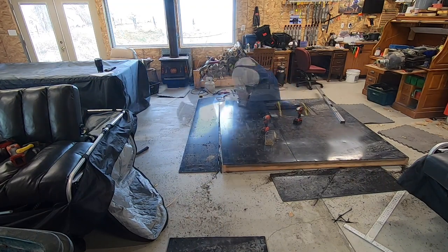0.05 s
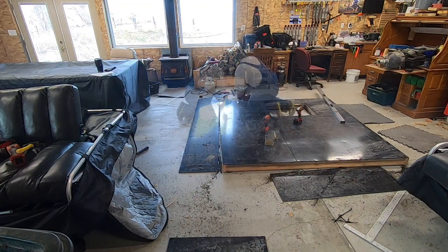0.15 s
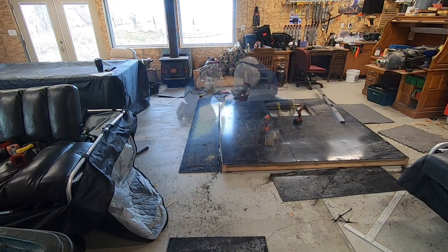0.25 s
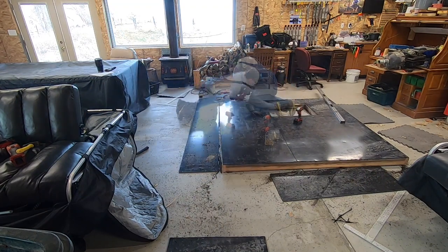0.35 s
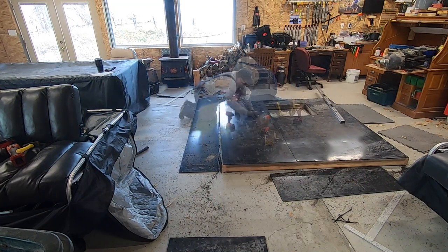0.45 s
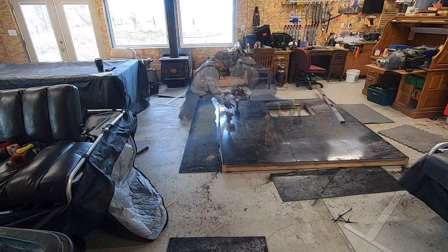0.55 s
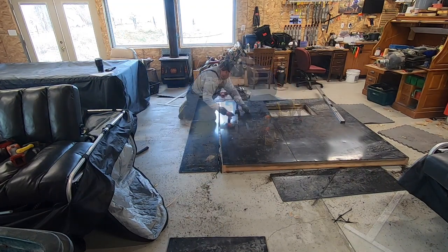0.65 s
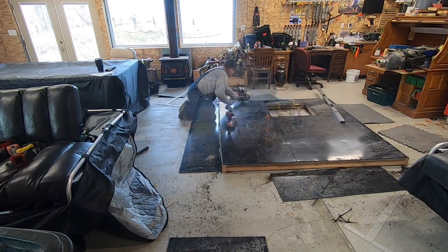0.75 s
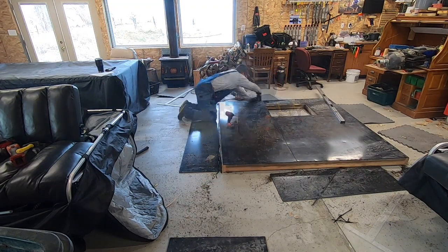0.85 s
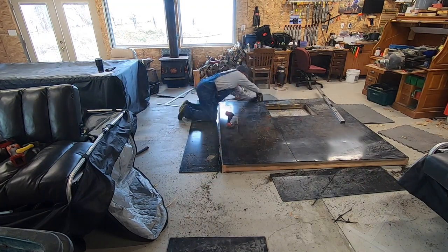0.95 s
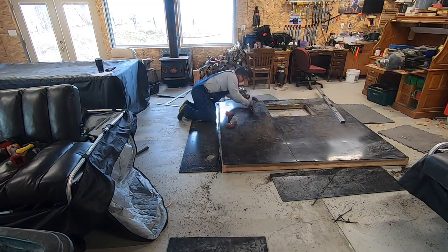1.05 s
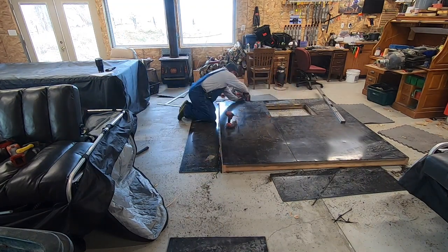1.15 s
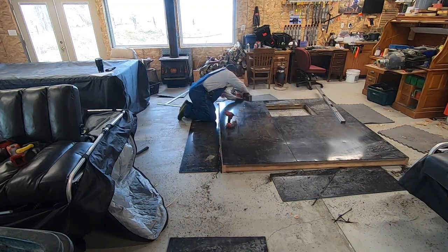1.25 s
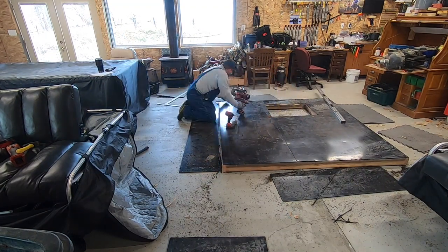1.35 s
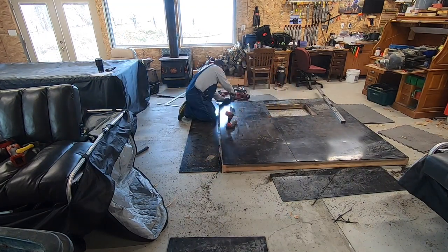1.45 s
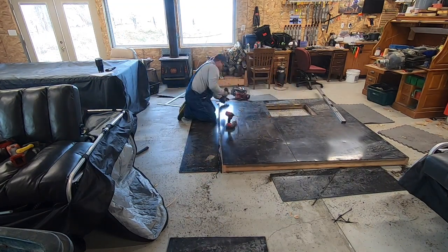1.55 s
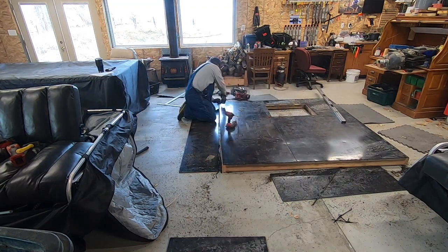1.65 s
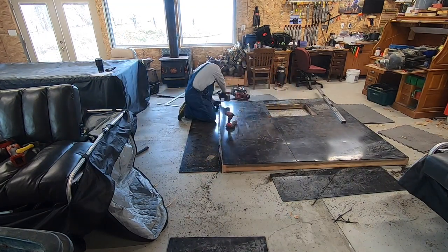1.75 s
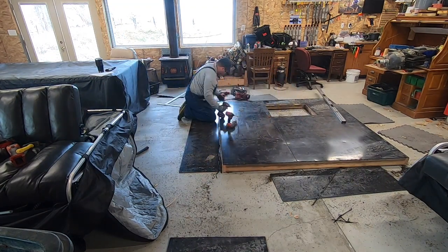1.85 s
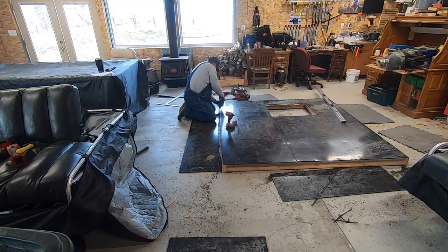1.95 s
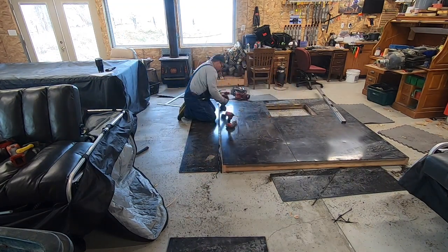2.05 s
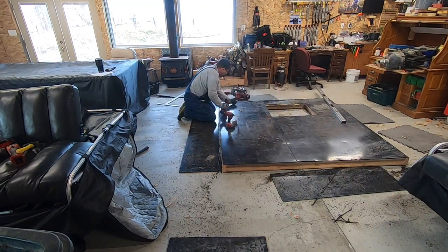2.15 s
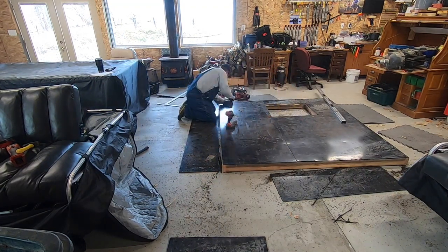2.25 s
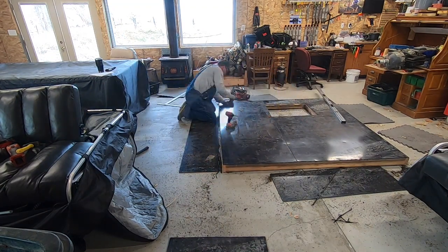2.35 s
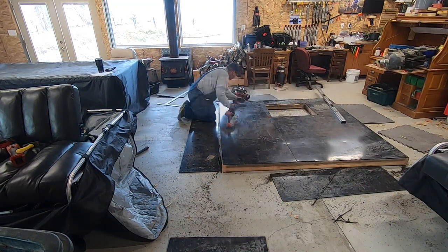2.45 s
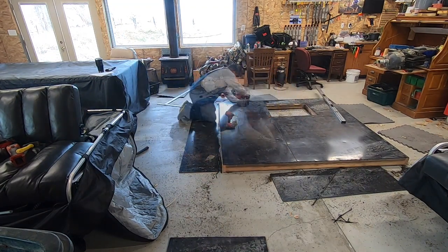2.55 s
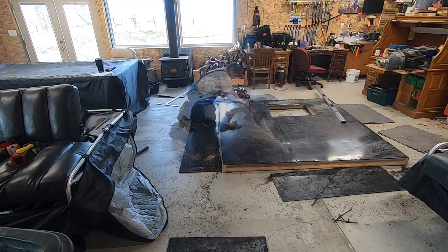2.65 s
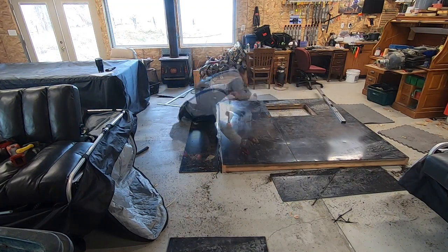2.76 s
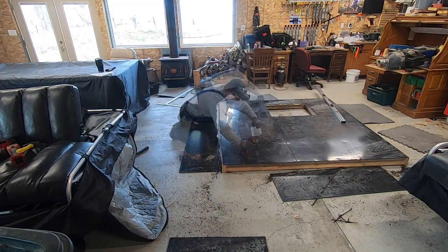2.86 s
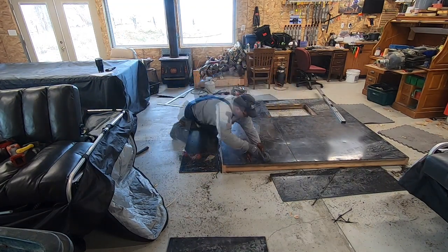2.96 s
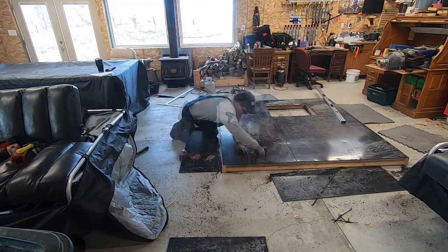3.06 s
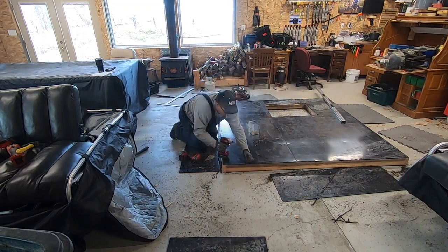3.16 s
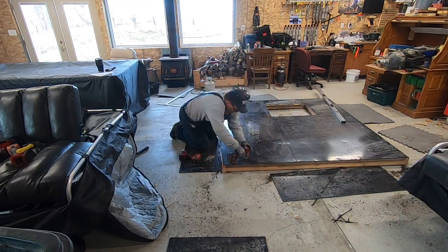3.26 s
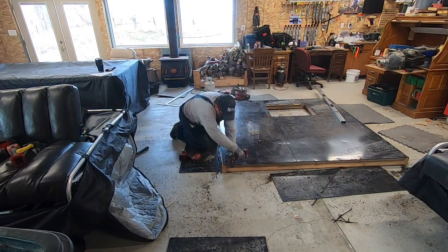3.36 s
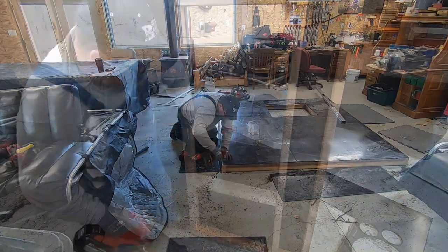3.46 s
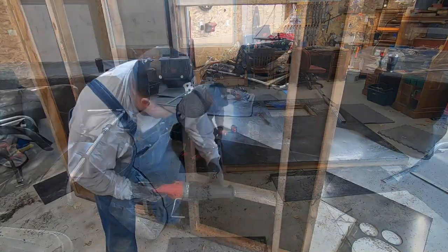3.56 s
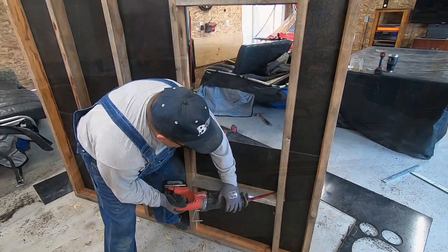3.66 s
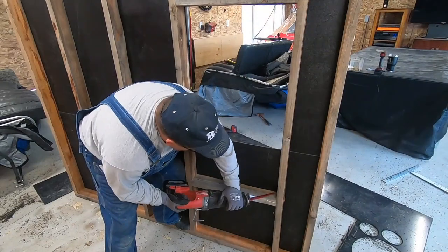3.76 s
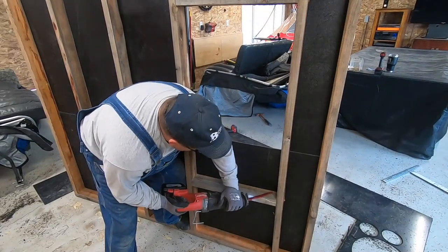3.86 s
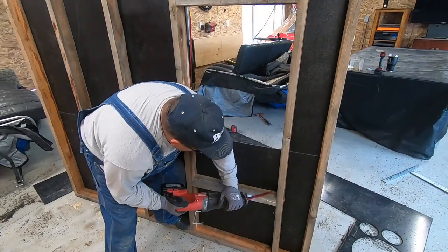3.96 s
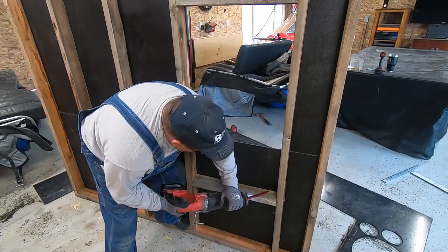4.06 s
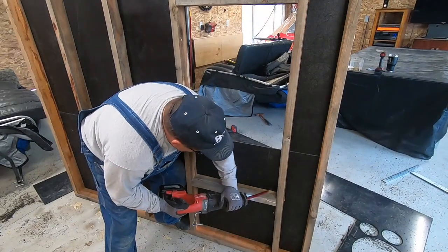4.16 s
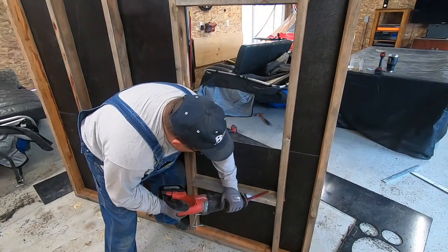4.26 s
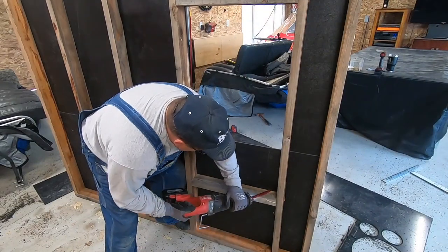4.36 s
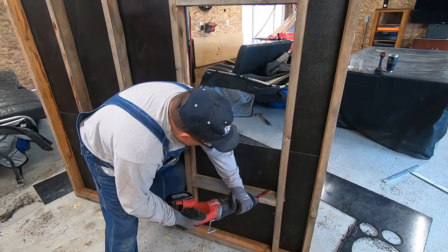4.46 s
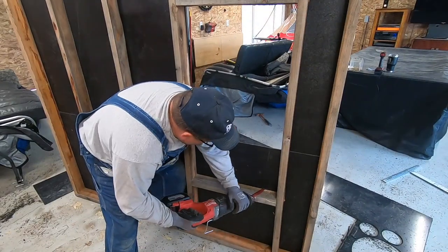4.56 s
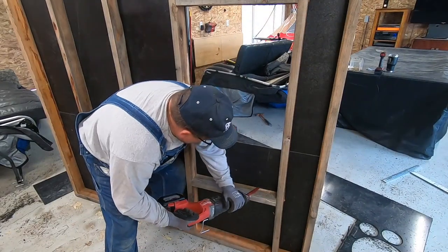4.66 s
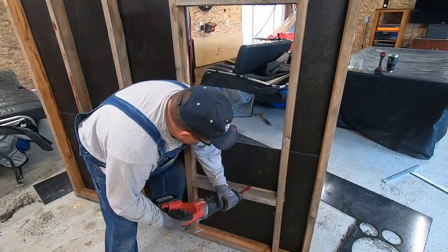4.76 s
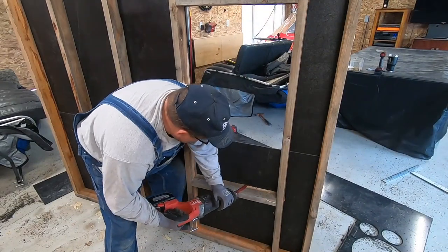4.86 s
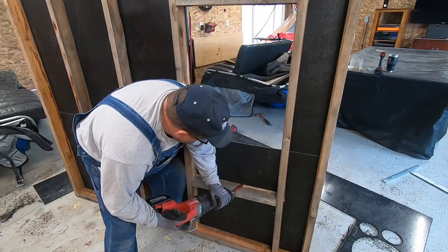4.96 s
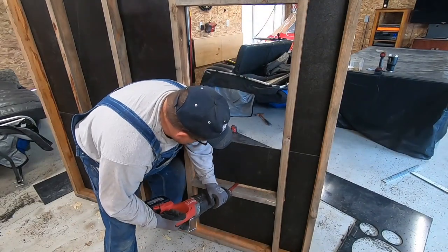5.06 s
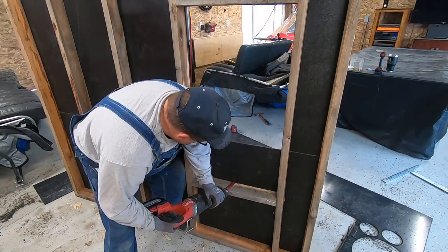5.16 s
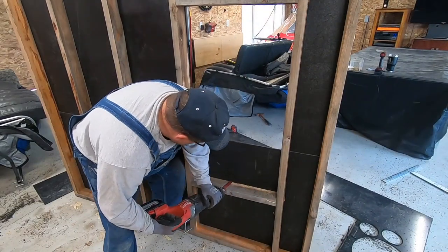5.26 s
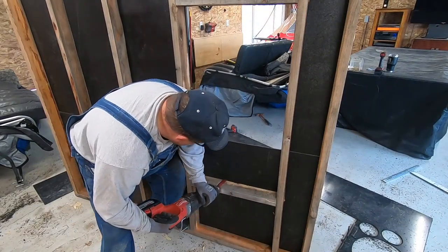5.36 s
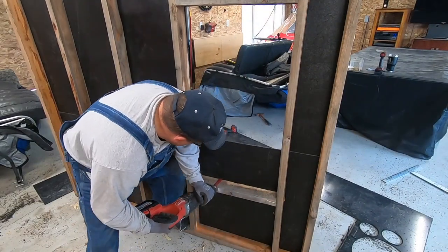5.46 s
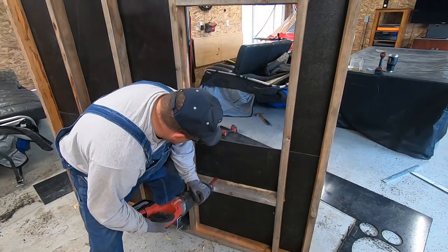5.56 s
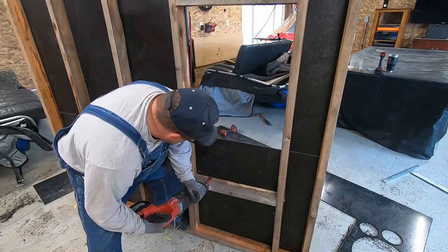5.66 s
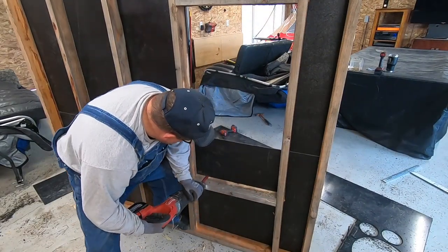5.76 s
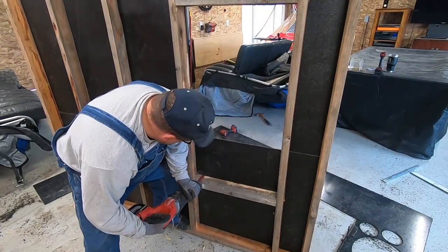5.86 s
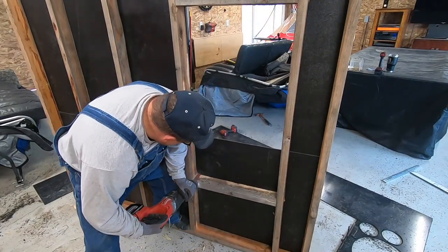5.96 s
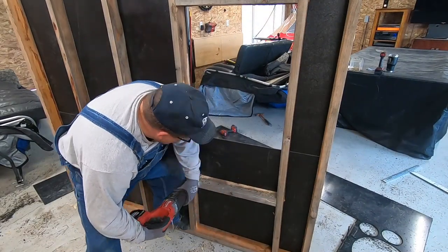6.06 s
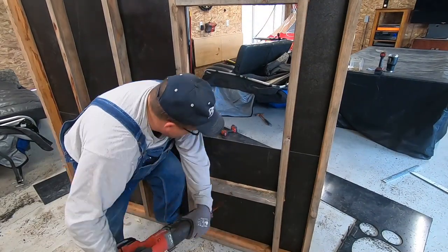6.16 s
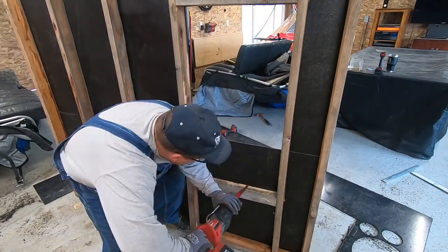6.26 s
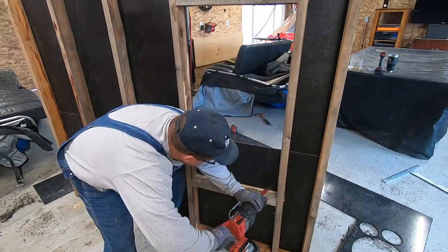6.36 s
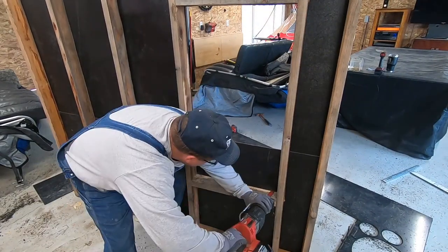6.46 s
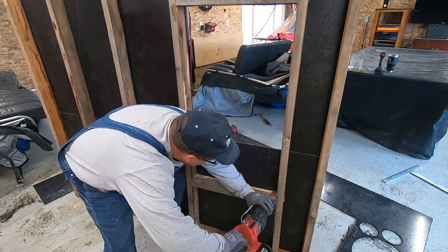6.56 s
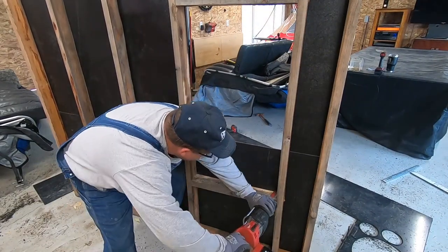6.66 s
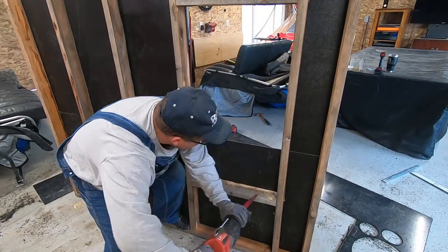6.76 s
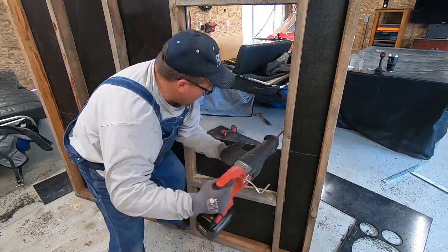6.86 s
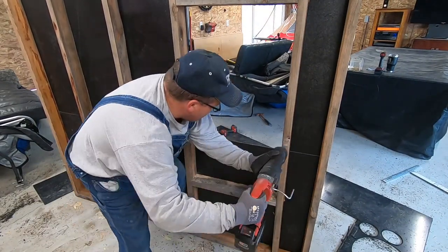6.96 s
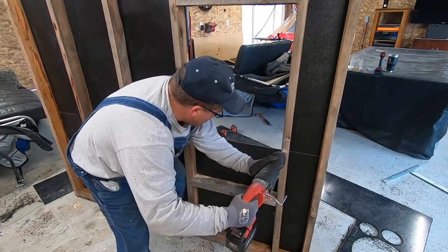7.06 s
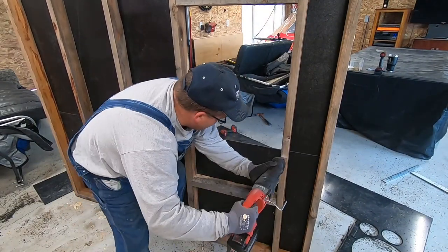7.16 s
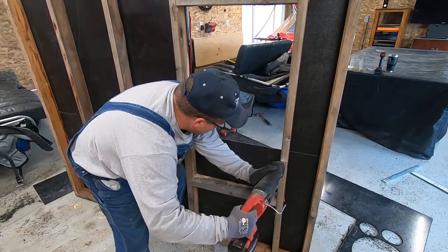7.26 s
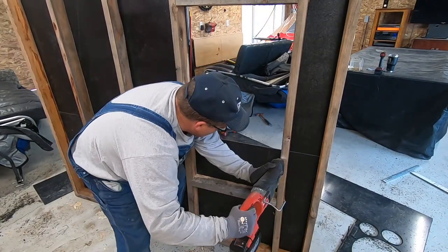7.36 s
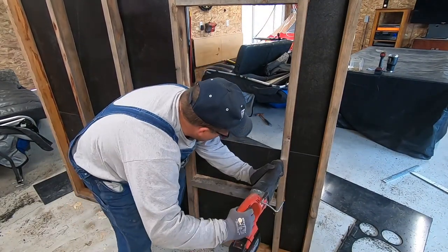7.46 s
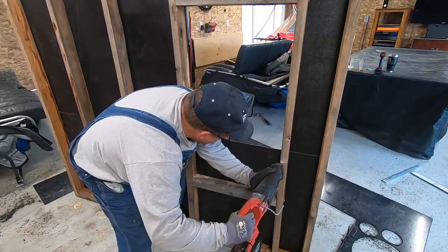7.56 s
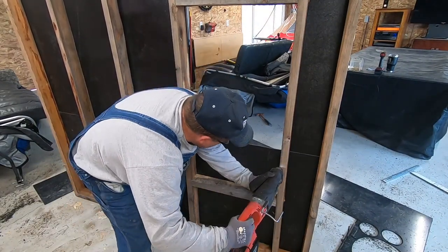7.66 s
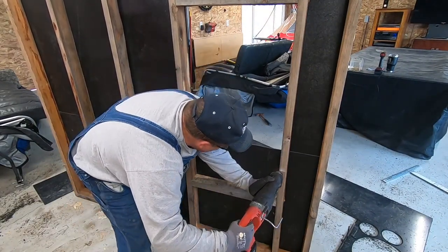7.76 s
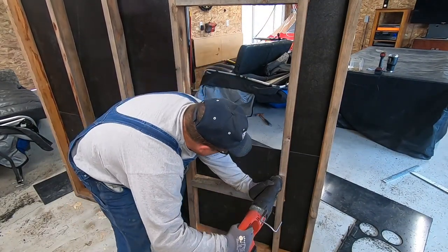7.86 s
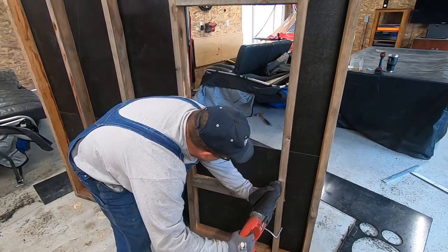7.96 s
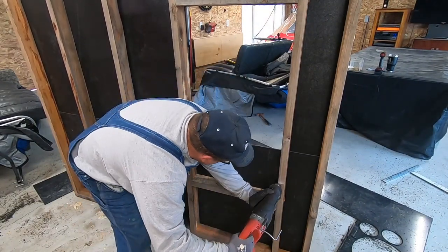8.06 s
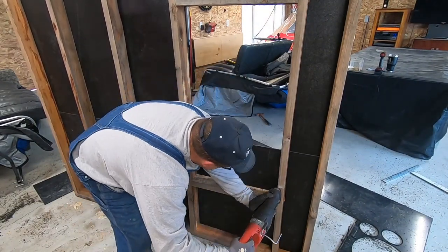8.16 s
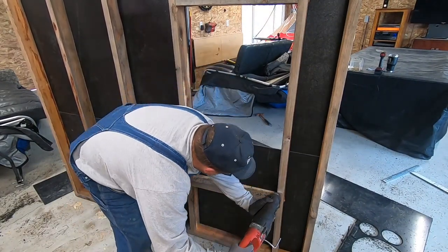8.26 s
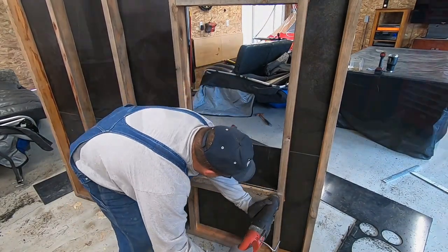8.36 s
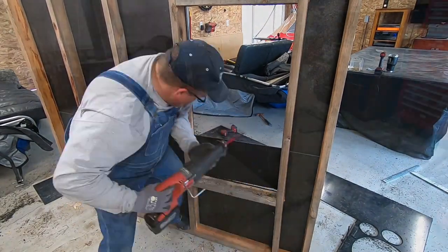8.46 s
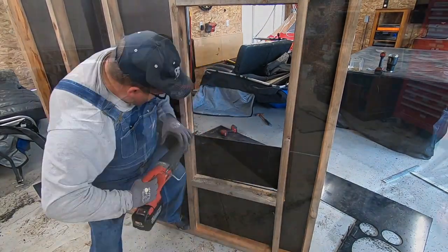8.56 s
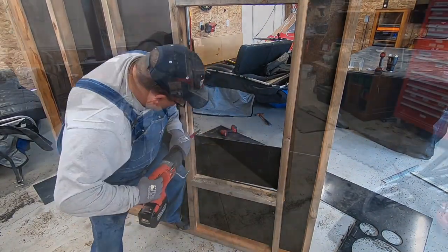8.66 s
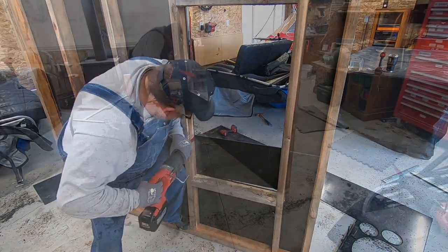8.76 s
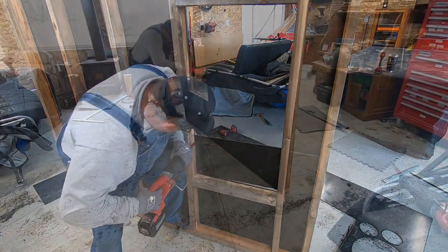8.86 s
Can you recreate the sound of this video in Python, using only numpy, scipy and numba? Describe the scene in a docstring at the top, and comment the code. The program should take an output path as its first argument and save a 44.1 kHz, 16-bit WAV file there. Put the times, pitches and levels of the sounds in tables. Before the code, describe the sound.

A cordless tool whines down, quick scratchy strokes rasp and knock on plastic sheet, then a reciprocating saw buzzes roughly through a wooden frame.

```python
"""A reciprocating saw cuts a wooden frame close by: wandering partials of the stroke rate over puffed grit.
Before it, a motor whine winds down nearby: tones glide down over a fading hiss.
Farther off, quick strokes rasp along a sheet as gated noise, and knocks rattle into its decaying modes.
A thin throbbing hum of steady high tones lies over the strokes; noise gives the air of the workshop.
Between the cuts the blade scrapes and chirps: noise through wood resonances, and short falling tones."""
import sys
import numpy as np
from scipy import signal
from scipy.fft import rfft, irfft, next_fast_len
from scipy.io import wavfile
from numba import njit

SR = 44100
rng = np.random.default_rng(int(sys.argv[2]) if len(sys.argv) > 2 else 0)


def attenuation_scalar(level_db):
    """Turn a level in dB into a linear amplitude multiplier (20 dB per decade)."""
    decades = np.asarray(level_db, float) / 20
    return 10 ** decades


def master_out(mix):
    """Clip the mix to full scale and print it as 16-bit PCM to the path in sys.argv[1]."""
    frames = np.transpose(np.atleast_2d(mix))
    ceiling = np.clip(frames, -1, 1)
    pcm = np.round(ceiling * 32767).astype(np.int16)
    wavfile.write(sys.argv[1], SR, pcm)


N = 393372
T = np.arange(N) / SR


def span(t0, t1):
    """Samples between two times in seconds."""
    return slice(int(t0 * SR), int(t1 * SR))


def curve(rows, edge=-100.):
    s, *columns = np.transpose(rows)
    return np.array([np.interp(T, s, c, edge, edge) for c in columns])


def colour(x, points):
    """Filter by (Hz, dB) points joined along a logarithmic frequency axis."""
    size = next_fast_len(N)
    hz, db = np.transpose(points)
    f = np.maximum(np.arange(size // 2 + 1) * SR / size, 1)
    gain = attenuation_scalar(np.interp(np.log(f), np.log(hz), db))
    return irfft(rfft(x, size) * gain, size)[:N]


def noise(points, lo_hz=10., hi_hz=SR / 2):
    """Coloured noise scaled to rms 1 between two frequencies."""
    x = colour(rng.standard_normal(N), points)
    f = np.linspace(0, SR / 2, 4000)[1:]
    hz, db = np.transpose(points)
    power = attenuation_scalar(2 * np.interp(np.log(f), np.log(hz), db))
    in_band = (f > lo_hz) * (f < hi_hz)
    return x / np.sqrt(np.mean(power * in_band))


def walk(rate, t=T, spread_db=None):
    """Random line with new knots rate times a second; with spread_db, a gain that wanders by some dB."""
    knots = 1.2 * rng.standard_normal(2000)
    values = knots if spread_db is None else attenuation_scalar(spread_db * knots)
    return np.interp(t - t[0], np.arange(len(knots)) / rate, values)


def tone(turns, wobble_db, drift, rate, scatter=1):
    """A sine, rms 1 before its wobble, on a phase in turns from a random start; level and phase wander."""
    t = T[:len(turns)]
    level = np.sqrt(2) * walk(rate, t, wobble_db)
    phase = 2 * np.pi * (turns + scatter * rng.random()) + drift * walk(rate, t)
    return level * np.sin(phase)


# Steady air of the workshop. Each row: frequency in Hz, noise colour in dB.
AIR_COLOUR = [(400, -1), (1800, 5), (2600, 7), (7000, 7.5), (15800, 6)]


def room_air():
    """Steady coloured noise whose level wanders slowly."""
    return noise(AIR_COLOUR) * attenuation_scalar(-61.5) * walk(2.4, T, 0.61)


# Gear whine of the tool close by. Each row: time in seconds, pitch in Hz, level in dB.
WHINE = [(.22, 15900, -54), (.26, 15000, -48), (.41, 13040, -50), (.5, 12900, -47), (.545, 12100, -53),
         (.565, 13500, -44), (.6, 11800, -57), (.63, 13570, -52), (.8, 11600, -60), (.86, 11000, -82)]
# Shaft of the same tool. Each row: time in seconds, turns per second, first tone in dB, higher tones in dB.
SHAFT_SPEED = [(.23, 655, -62, -61), (.39, 545, -68, -59), (.48, 535, -70, -59), (.61, 517, -92, -61),
               (.72, 530, -95, -65), (.85, 490, -95, -82)]
# Higher shaft tones. Each row: multiple of the shaft rate, level in dB over the higher-tone level.
SHAFT_TONES = [(2, -7), (3, -2), (5, -13), (9.4, -10), (12.3, -8), (23.2, -6)]
# Buzz of the tool under load. Each row: starting frequency in Hz, level in dB before the buzz level.
BUZZ_TONES = [(750, -62), (990, -63), (1244, -52), (1491, -49), (1992, -59), (2245, -61), (5200, -59),
              (8183, -60)]
# How the load comes and goes. Each row: time in seconds, buzz tones in dB, hiss in dB.
BUZZ_LEVEL = [(0, -10, -51.5), (.15, -2, -50), (.205, -4, -53.5), (.24, -30, -52)]
# Hiss of the tool. Each row: frequency in Hz, noise colour in dB.
TOOL_HISS = [(100, -8), (500, -7), (1200, 10.5), (3000, 6), (8000, 8.5), (15800, 5.5)]


def winding_tool():
    """Gear and shaft tones glide, mostly down, as the tool coasts; a rough, slightly rising buzz comes first."""
    on = span(0, 0.868)
    t = T[on]
    whine_turns = np.cumsum(curve(WHINE, None)[0, on]) / SR
    whine = attenuation_scalar(curve(WHINE)[1, on]) * tone(whine_turns, 3.3, 1.3, 91.5)

    shaft_turns = np.cumsum(curve(SHAFT_SPEED, None)[0, on]) / SR
    first_db, higher_db = curve(SHAFT_SPEED)[1:, on]
    first = attenuation_scalar(first_db) * tone(shaft_turns, 1.5, .3, 20)
    higher = sum(attenuation_scalar(db) * tone(shaft_turns * k, 5.0, .3 * k, 28) for k, db in SHAFT_TONES)

    buzz_db, load_hiss_db = curve(BUZZ_LEVEL)[:, on]
    buzz = sum(attenuation_scalar(db) * tone(f * t * (1 + .06 * t), 3.0, 1.1, 30) for f, db in BUZZ_TONES)

    coasting = t - 0.233  # seconds since the tool is let go
    coast_hiss_db = np.where(coasting > 0, -54 - 18.5 * coasting, -100)  # fades 18.5 dB per second
    hiss = (noise(TOOL_HISS, 4400.0, 8400.0) * walk(62.6, T, 1.9))[on]

    out = np.zeros(N)
    out[on] = whine + first + attenuation_scalar(higher_db) * higher + attenuation_scalar(buzz_db) * buzz
    out[on] += hiss * attenuation_scalar(np.maximum(coast_hiss_db, load_hiss_db))
    return out


def blows():
    """Loose knocks, and the graze, bite and stop of every stroke: (s, dB, s to build up)."""
    graze_s, graze_db = .043, -40  # a faint touch this long before each bite
    bite_db = 23.5  # bite knock over the rasp
    stop_swell_s = .007
    rows = [(s, db, 0) for s, db in KNOCKS]
    for bite, stop, rasp_db, stop_db in STROKES:
        rows.append((bite - graze_s, graze_db, 0))
        rows.append((bite, rasp_db + bite_db, 0))
        rows.append((stop - stop_swell_s / 2, stop_db, stop_swell_s))
    return rows


# Tool set down before a stroke, rebounding after it, or bumped. Each row: start in seconds, level in dB.
KNOCKS = [(0.2795, -34.5), (0.344, -31.5), (.4446, -34), (0.492, -29.5), (0.667, -26.5), (0.8, -22),
          (.9492, -31), (1.061, -21), (1.1317, -37), (1.221, -36), (1.2376, -21.5), (1.3416, -23.5),
          (1.498, -24), (1.702, -38.5), (1.743, -24.5), (1.856, -24.5), (2.0212, -25.5), (2.116, -31.5),
          (2.3037, -25.5), (2.4066, -29.5), (2.544, -36), (2.588, -29), (2.685, -28), (2.7257, -33),
          (2.862, -27.5), (2.9395, -35), (3.1462, -22.5), (3.2642, -24), (3.316, -34), (3.356, -14),
          (3.462, -30), (3.693, -32.5)]
# Modes of the struck sheet. Each row: central frequency in Hz, central level in dB, 60 dB decay in seconds.
SHEET_MODES = [(2480, 14, 0.018), (3300, 11, 0.011), (4010, 10, 0.011), (5560, 15, 0.0024)]


def knocks():
    """Each knock rattles for a few ms into the modes of the sheet, whose pitch and level vary by blow."""
    t = np.arange(2000) / SR
    out = np.zeros(N + len(t))
    rows = blows()
    chance = rng.standard_normal((len(rows), 900))
    for (s, db, swell), draw in zip(rows, chance):
        ring = np.zeros(len(t))
        for (f, mode_db, t60), level_chance, pitch_chance in zip(SHEET_MODES, draw[::-1], draw[-99:]):
            mode_hz = f * (1 + 0.034 * pitch_chance)
            decay = 1000 ** (-t / t60)
            ring += attenuation_scalar(mode_db + 3.0 * level_chance) * np.sin(2 * np.pi * mode_hz * t) * decay
        early = t[:len(draw)]
        rise = (early / (swell + 1 / SR)) ** 2
        fall = np.exp((swell - early) / 0.0054)
        rattle = draw * np.where(early < swell, rise, fall)
        hit = signal.fftconvolve(ring, rattle)[:len(t)]
        hit = hit / np.abs(hit).max()
        hit[:len(draw)] += attenuation_scalar(-11.0) * rattle  # the bare contact noise
        first = int(s * SR)
        out[first:first + len(t)] += attenuation_scalar(db) * hit
    return colour(out[:N], [(900, -25.5), (1800, -17.0), (2200, -1.5)])


# Thin high hum. Each row: frequency in Hz, level in dB before the slow level.
HUM_TONES = [(4845, -89), (5814, -84), (6783, -77), (7752, -82), (9690, -89), (13517, -84)]
# Slow level of the hum. Each row: time in seconds, gain in dB.
HUM_LEVEL = [(.5, -28), (.7, 10), (2.8, 10), (3.5, -4)]


def high_hum():
    """Steady high tones throb together in level."""
    on = span(0, 3.5)
    throb_hz, throb_depth = 69.5, 0.47
    hum = sum(attenuation_scalar(db) * tone(f * T[on], 1.5, 0.33, 3.57) for f, db in HUM_TONES)
    throb = 1 + throb_depth * np.sin(2 * np.pi * throb_hz * T[on])
    out = np.zeros(N)
    out[on] = hum * throb * attenuation_scalar(curve(HUM_LEVEL)[0, on])
    return out


# Dull bumps as the tool is laid down. Each row: start in seconds, level in dB before colouring.
THUDS = [(.542, -45), (.65, -47)]


def thuds():
    """Each bump is a sudden burst of dull noise that dies away exponentially."""
    bumps = sum(attenuation_scalar(db) * (T > s) * np.exp(-(T - s).clip(0) / .012) for s, db in THUDS)
    return bumps * noise([(300, -8), (900, -17)])


# Quick strokes on the sheet. Each row: blade bites in seconds, blade stops in seconds, rasp in dB,
# stop knock in dB.
STROKES = [(0.973, 1.02, -47.5, -24), (1.259, 1.3, -46.5, -18.5), (1.52, 1.559, -46.5, -14),
           (1.758, 1.798, -44.5, -23.5), (2.0497, 2.0766, -44.5, -24), (2.33, 2.371, -46, -20),
           (2.613, 2.647, -48.5, -23.5), (3.051, 3.109, -47, -21), (3.286, 3.335, -44, -30),
           (3.4834, 3.517, -45.5, -41)]
# Slow strokes without bite. Each row: start in seconds, end in seconds, early level in dB.
SLIDES = [(0.556, 0.67, -62.5), (2.658, 2.705, -61.5), (2.788, 2.91, -58.5)]
# Rasp of the blade. Each row: frequency in Hz, noise colour in dB.
RASP = [(1500, -7), (2050, -7.5), (2400, 6), (2850, 2), (3300, 3.5), (4200, 1), (8000, -3), (15800, -6.5)]


def strokes():
    """Dense, uneven scratching: faint at first, full at the bite, cut short; slides swell in."""
    lead_s, lead_db, trail_s = 0.027, -4.5, 0.0065  # rasp before the bite, its level, rasp after the stop
    level = np.zeros(N)
    for bite, stop, db, _ in STROKES:
        times = [bite - lead_s, bite - .002, bite, stop + trail_s, stop + trail_s + 0.0076]
        level += np.interp(T, times, [0, attenuation_scalar(db + lead_db), attenuation_scalar(db), attenuation_scalar(db - 1.0), 0])
    for start, end, db in SLIDES:
        times = [start - .012, start + 0.0081, end, end + 0.007]
        level += np.interp(T, times, [0, attenuation_scalar(db), attenuation_scalar(db + 6.0), 0])
    return noise(RASP, 8000., 11000.) * level * walk(260, T, 2.2) * walk(70, T, 1.8)


# Thin tones before the first cut. Each row: frequency in Hz, level in dB before the slow level.
IDLE_TONES = [(388, -68), (3101, -70), (3876, -72)]
# Slow level of those tones. Each row: time in seconds, gain in dB.
IDLE_LEVEL = [(3.4, -25), (3.54, -2), (3.78, -4), (3.85, -34)]


def idle_tones():
    """A few thin steady pitches, wandering in level and phase, until the first cut."""
    on = span(3.4, 3.85)
    tones = sum(attenuation_scalar(db) * tone(f * T[on], 2.5, 0.9, 50) for f, db in IDLE_TONES)
    out = np.zeros(N)
    out[on] = tones * attenuation_scalar(curve(IDLE_LEVEL)[0, on])
    return out


# Blade dragged, set down or started between cuts, close by. Each row: peak in seconds, level in dB,
# time to die away in seconds, treble in dB over the level.
HANDLING = [(3.56, -60.5, 0.62, -21), (3.676, -51, 0.072, -46), (3.787, -33, 0.059, -32),
            (6.156, -30.5, 0.088, -26), (6.264, -40.5, 0.047, -29), (6.318, -45, 0.031, -24),
            (6.343, -31.5, 0.045, -29), (6.668, -33.5, 0.13, -27), (6.718, -35, 0.042, -24.5),
            (6.793, -30.5, 0.054, -26.5), (6.9, -45.5, 0.063, -44), (6.96, -49, 0.046, -25),
            (7.011, -37, 0.17, -20.5), (8.491, -55, 0.12, -32), (8.572, -48.5, 0.1, -26),
            (8.639, -39.5, 0.17, -18)]
# Resonances of the wooden frame. Each row: frequency in Hz, width in Hz, level in dB.
FRAME = [(245.2, 5.7, 9.5), (638, 74, 4.5), (1174, 990, 5), (1800, 110, -3), (2700, 110, -6)]
# Hiss of scrapes and cutting. Each row: frequency in Hz, noise colour in dB.
GRIT = [(2000, -21), (4000, 4.5), (8000, 4.5), (15800, 0)]


def handling():
    """Scrapes ring the broad resonances of the wooden frame, with a hiss above."""
    body, treble, rise = np.zeros(N), np.zeros(N), .017
    for s, db, length, treble_db in HANDLING:
        on = span(s - rise, s + length)
        since = T[on] - s
        shape = np.where(since < 0, (1 + since / rise) ** 2, np.cos(np.pi / 2 * since / length) ** 2)
        body[on] += shape * attenuation_scalar(db)
        treble[on] += shape ** 2 * attenuation_scalar(db + treble_db)
        # the room holds on to the wood tone
        on = span(s, s + .3)
        since = T[on] - s
        body[on] += attenuation_scalar(db - 8.5) * (1 - np.exp(-since / length)) * 1000 ** (-since / 0.27)
    scrape = rng.standard_normal(N) * walk(100, T, 1.0)
    modes = sum(attenuation_scalar(db) * signal.lfilter(*signal.iirpeak(f, f / w, SR), scrape) for f, w, db in FRAME)
    wood = colour(modes, [(60, -46), (180, 13)])
    return body * wood / wood.std() + treble * noise(GRIT, 8650.0, 8790.0)


# One table per cut, close by. Each row: time in seconds, nominal stroke rate in Hz, hiss in dB,
# low grind in dB over it, frequency in Hz where the frame rings loudest.
CUTS = [
    [(3.78, 384.3, -47, -2, 1240), (3.88, 368.7, -42, -12.5, 1100), (4.1, 360, -43, -13, 1800),
     (4.36, 366, -41.5, -12, 1786), (4.43, 353, -43, -5.5, 990), (4.6, 351.6, -40.5, -7.5, 1016),
     (5.05, 348, -41.5, -6, 729.3), (5.15, 348.3, -44.5, -0.5, 1117), (5.32, 336, -40, -9, 1090),
     (5.55, 342.6, -40, -8, 732), (5.8, 338.3, -42, -7, 897), (6.08, 344.5, -46.5, -6.5, 895)],
    [(6.33, 370, -47.5, 4, 1087), (6.46, 334, -40, -10, 989), (6.665, 331, -43, -7, 811)],
    [(7.005, 363, -60, -4, 1093), (7.1, 358.4, -44, -2, 1808), (7.118, 353, -44, -4, 1170),
     (7.305, 344.4, -42, -7.5, 1010), (7.325, 365.6, -50, 1, 1788), (7.41, 350.2, -47, -3, 1765),
     (7.45, 365, -53.5, 0, 1836), (7.52, 349.3, -44, -4.5, 1590), (7.68, 335.3, -41.5, -6, 930),
     (7.82, 334.7, -42.5, -4.5, 698.4), (7.92, 339.3, -41, -6, 1029), (8.2, 338.7, -41, -12, 1063),
     (8.41, 338.8, -43, -4, 1506)],
    [(8.635, 329.5, -49.5, -9, 620), (8.725, 341, -45, -3, 728), (8.92, 335.4, -46, -11, 714)],
]
# How each cut shakes the frame. Each row: stroke tone, its multiple 2, its multiple 3, bounce,
# in dB over the hiss before load and ringing.
SHAKE = [(-7, 2.5, 1.5, -9), (2.5, 2, 1, 0), (2, -2, 2, -2), (2.5, 3.5, -2.5, -12)]
# Further multiples. Each row: multiple of the stroke rate, level in dB over the hiss before ringing.
OVERTONES = [(4, -0.5), (5, 1.5)]
# Upper stack. Each row: multiple of the stroke rate, relative level in dB.
UPPER = [(6, -7), (8, -6), (9, -12), (12, -12), (16, -17), (24, -20)]
# Bounce of the frame. Each row: multiple of a third of the stroke rate, relative level in dB.
BOUNCE = [(2, -5), (4, -8.5), (10, 7)]
# The blade chatters in the cut. Each row: start in seconds, end in seconds, level in dB over the hiss.
CHATTER = [(6.55, 6.646, -14), (7.085, 7.27, -8)]
# Delay of each cut's stroke tone: one number per cut, the time in seconds to come in fully.
SETTLE_S = [0.012, 0.11, 0.14, 0.034]
# High partials stand out as the first cut ends. Each row: time in seconds, gain in dB.
SQUEAL = [(5.6, -2), (5.75, 7), (6.03, 10), (6.08, -4)]
# The blade sings on partials near a moving pitch. Each row: time in seconds, pitch in Hz, gain in dB.
BLADE = [(4.65, 7000, 6), (4.8, 6570, 16), (5, 6300, 13), (5.3, 6287, 20), (5.55, 6713, 0),
         (5.95, 7330, 11.5), (6.08, 7590, -1), (8.1, 6600, -2), (8.25, 6590, 15), (8.41, 6844, 13)]
# Low grind of the cut. Each row: frequency in Hz, noise colour in dB.
GRIND = [(170, -48), (230, 2), (450, 2), (620, 17.5), (820, 16), (1300, 21.5), (3000, 17), (6000, 0)]


def saw():
    """Blade strokes give a stack of wandering partials; cutting grit is puffed once a stroke."""
    free_hz, sag_hz = 357, 12.2  # stroke rate in air; drop under full load
    run_out_s, run_out_db = 0.075, -30  # all dies away at the stop
    on = span(3.7, 9)
    t = T[on]
    hz, grit_db, grind_db, ring_hz = curve(sum(CUTS, []), None)[:, on]
    start, stop = np.array([(cut[0][0], cut[-1][0]) for cut in CUTS]).T
    which = np.maximum(np.searchsorted(start, t) - 1, 0)  # the latest cut
    since = t - start[which]
    after = np.maximum(t - stop[which], 0) / run_out_s

    # the rate trembles, and starts 30 % low at each cut
    spin_up = .3 * np.exp(-since.clip(0) / .016)
    turns = np.cumsum(hz * (1 + .005 * walk(75, t) - spin_up)) / SR
    running = (since / 0.0096).clip(0, 1) * (after < 1) * attenuation_scalar(run_out_db * after)
    caught = attenuation_scalar(0.093 * run_out_db * after.clip(0, 1))  # tones die a little faster than grit
    # grit levels stay as they were at the stop
    held = np.where(after > 0, np.searchsorted(t, stop[which]), np.arange(len(t))).clip(0, len(t) - 1)
    grit_db, grind_db = grit_db[held], grind_db[held]
    unloaded = 1 - ((free_hz - hz) / sag_hz).clip(0, 1)
    first_db, second_db, third_db, bounce_db = np.transpose(SHAKE)[:, which]

    def ring_db(k):
        """Boost of a partial near the pitch where the frame rings, within about 0.24 octave."""
        return 6 * np.exp(-(np.log2(k * hz / ring_hz) / 0.24) ** 2)

    settled = (since / np.array(SETTLE_S)[which]).clip(0, 1) ** 4
    low = attenuation_scalar(first_db + 3.5 * unloaded) * settled * walk(6, t, 1.5) * tone(turns, 1.3, .3, 30)
    for k, db in [(2, second_db - 16 * unloaded), (3, third_db)] + OVERTONES:
        low = low + attenuation_scalar(db + ring_db(k)) * walk(7.4, t, 1.6) * tone(k * turns, 2.5, 0.46, 40, 0.63)

    # upper partials come and go on their own as the blade finds new wood
    squeal_db = curve(SQUEAL, 0)[0, on]
    blade_hz, blade_db = curve(BLADE, None)[:, on]
    order, order_db = np.transpose(UPPER)
    upper = np.zeros(len(t))
    for k in range(6, 25):
        sings_db = blade_db * np.exp(-((k * hz - blade_hz) / 350.0) ** 2)
        gain_db = np.interp(k, order, order_db) + ring_db(k) / 2 + (k > 10) * squeal_db + sings_db
        upper += attenuation_scalar(gain_db) * walk(14, t, 1.8) * tone(k * turns, 2.6, .6, 30, .7)
    # the harder the blade grinds, the weaker the clean upper stack
    upper *= attenuation_scalar(-5.0 - 0.85 * grind_db) * walk(24, t, 2.5)

    # the frame jumps every third stroke, more under load
    bounce = sum(attenuation_scalar(db) * tone(k * turns / 3, 4.9, 2.1, 30) for k, db in BOUNCE)
    bounce = bounce * attenuation_scalar(bounce_db + 1.8 * grind_db - 8 * unloaded)
    chatter = sum(attenuation_scalar(db) * np.interp(t, [a, a + 0.017, b - .01, b], [0, 1, 1, 0]) for a, b, db in CHATTER)
    chatter = chatter * sum(tone(k * turns / 3, 3.0, .4, 20) for k in range(2, 22) if k % 3)

    hiss = noise(GRIT, 6640.0, 12800.0)
    rub = colour(hiss, [(4500, -4.5), (7500, -13)])[on]  # the lower hiss grows with the grind
    grind = attenuation_scalar(1.39 * grind_db + 15.0) * walk(28, t, 2.9) * noise(GRIND)[on]
    grit = hiss[on] + (attenuation_scalar(0.93 * (grind_db + 12.5)) - 1) * rub + grind
    puffs = 1 + 0.17 * np.cos(2 * np.pi * turns)
    grit = grit * puffs * walk(50, t, 0.43)

    out = np.zeros(N)
    out[on] = running * attenuation_scalar(grit_db) * (caught * (low + upper) + bounce + chatter + grit)
    return out


# Short chirps of the blade against the wood. Each row: centre in seconds, pitch there in Hz, level in dB.
CHIRPS = [(6.803, 1416, -33), (7.02, 1770, -31), (8.575, 1816, -46), (8.605, 667, -53)]


def chirps():
    """Each chirp is a short bell-shaped tone with slightly falling pitch."""
    half_s, fall = 0.0122, 0.025  # half length in seconds; share of pitch lost over it
    out = np.zeros(N)
    for s, hz, db in CHIRPS:
        on = span(s - 2 * half_s, s + 2 * half_s)
        u = T[on] - s
        turns = hz * u * (1 - fall * u / half_s / 2)
        out[on] += attenuation_scalar(db) * np.exp(-(u / half_s) ** 2) * tone(turns, 1.4, 0.73, 142)
    return out


def spread(x, side):
    """Left and right: the side is the same sound scrambled, leaning a little to the right."""
    other = colour(x * (walk(140) - .15), side)
    return np.array([x + other, x - other])


# Stereo width of the far sounds. Each row: frequency in Hz, side filter gain in dB.
FAR_SIDE = [(700, -2.5), (1300, -3.5), (2400, -21), (4400, -20.5), (8000, -14), (15000, -4.5)]
# Stereo width of the sounds close by. Each row: frequency in Hz, side filter gain in dB.
NEAR_SIDE = [(110, -13), (380, -19), (1300, -35), (3800, -22.5), (5000, -5), (15000, -2)]


def scene():
    """The far sounds and the close ones have their own stereo width."""
    far = room_air() + knocks() + high_hum() + strokes()
    near = winding_tool() + thuds() + idle_tones() + handling() + saw() + chirps()
    return spread(far, FAR_SIDE) + spread(near, NEAR_SIDE)


@njit
def follower(x, attack, release):
    """Envelope that rises fast and falls slowly."""
    out, e = np.empty(len(x)), 1e-4
    for i in range(len(x)):
        e += (x[i] - e) * (attack if x[i] > e else release)
        out[i] = e
    return out


def low_pass(x):
    """Removes everything above the highest recorded frequency."""
    return signal.sosfilt(signal.butter(12, 17050, fs=SR, output="sos"), x)


def record(dry):
    """Microphone gain control dips the background after loud bursts; peaks are rounded, the top is cut."""
    envelope = follower(np.abs(dry).max(axis=0), 1 / (0.0043 * SR), 1 / (0.06 * SR))  # rise, fall in s
    x = dry * attenuation_scalar(1.5) * (1 + envelope / attenuation_scalar(-58.5)) ** -.12
    x = .115 * np.tanh(x / .115)
    top_cut = signal.ellip(10, .2, 80, 15850, fs=SR, output="sos")
    x = signal.sosfilt(top_cut, x)
    return low_pass(x)


dry = scene()
out = record(dry)
master_out(out)
```